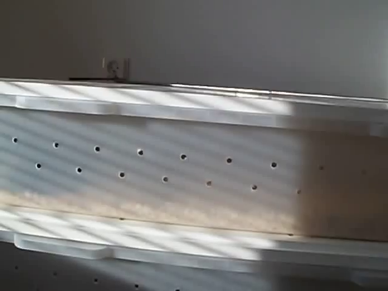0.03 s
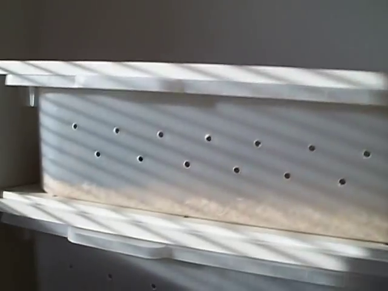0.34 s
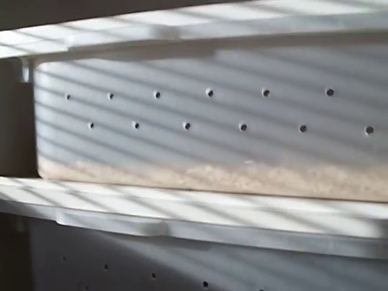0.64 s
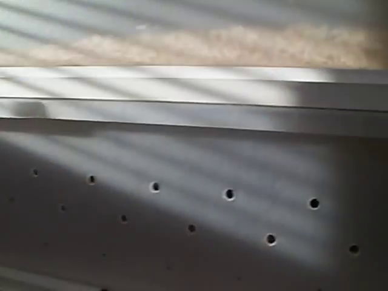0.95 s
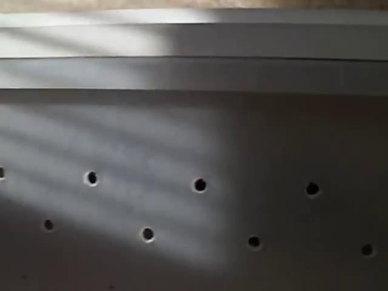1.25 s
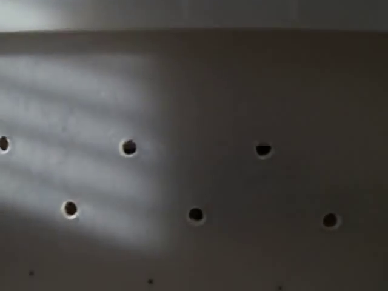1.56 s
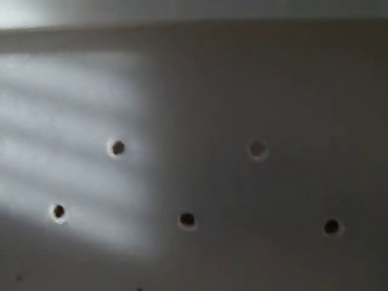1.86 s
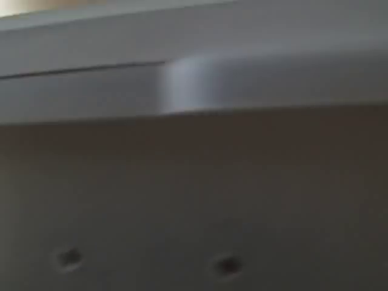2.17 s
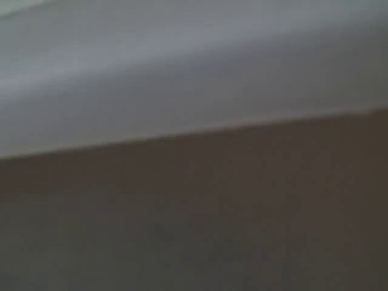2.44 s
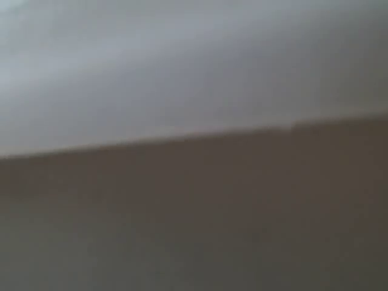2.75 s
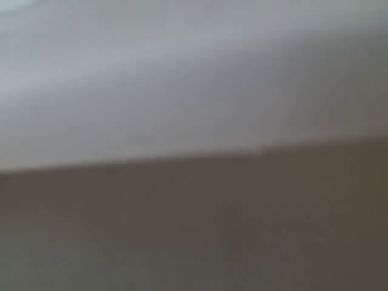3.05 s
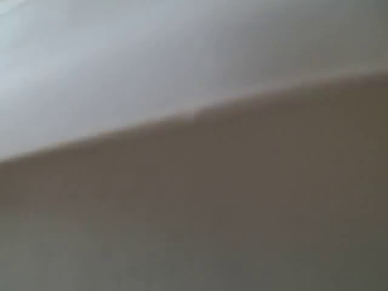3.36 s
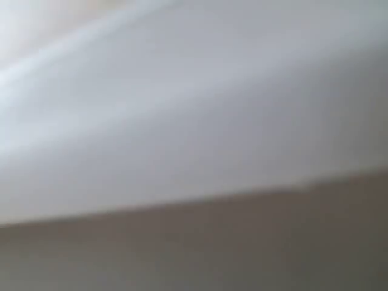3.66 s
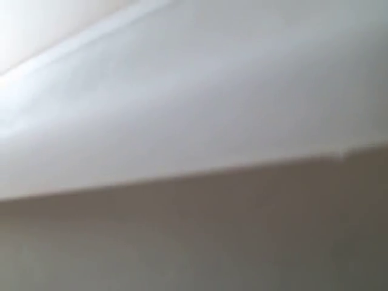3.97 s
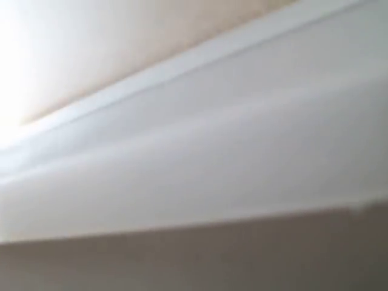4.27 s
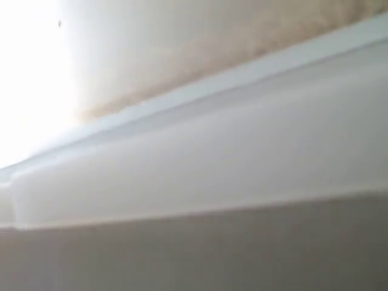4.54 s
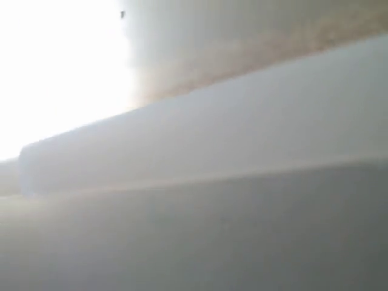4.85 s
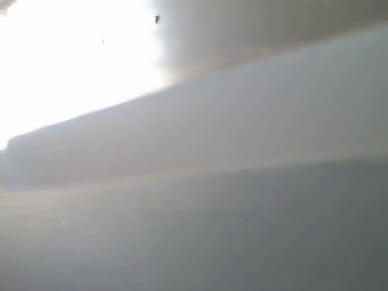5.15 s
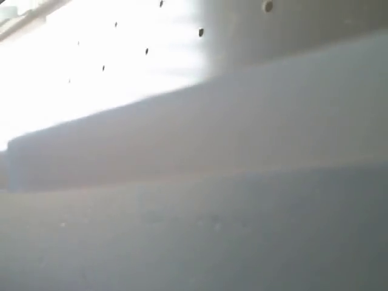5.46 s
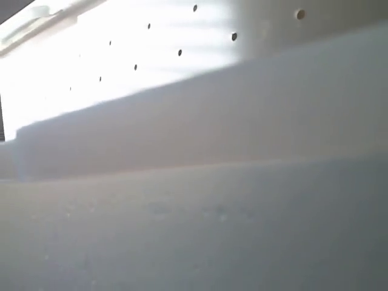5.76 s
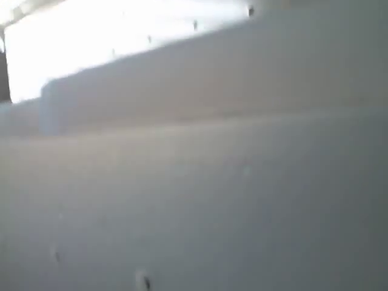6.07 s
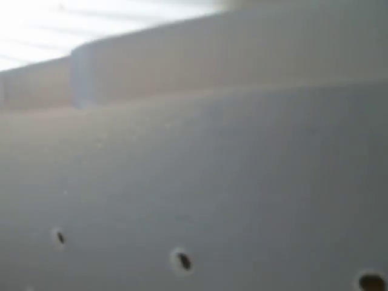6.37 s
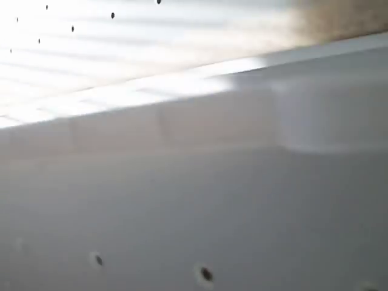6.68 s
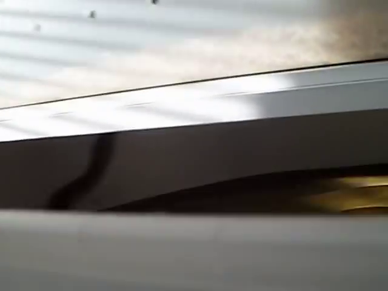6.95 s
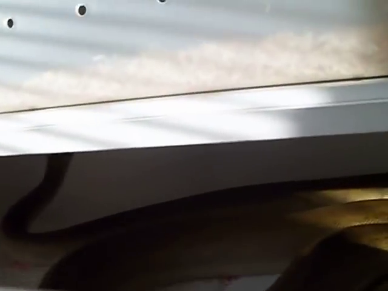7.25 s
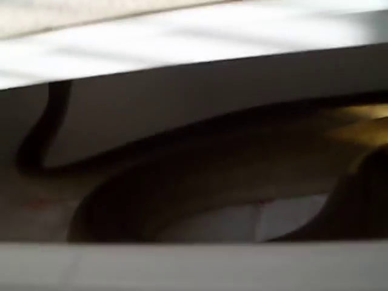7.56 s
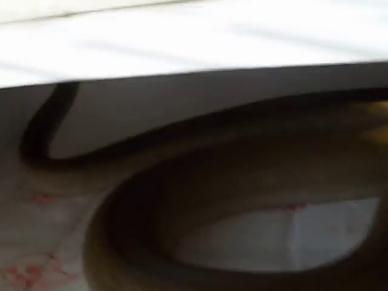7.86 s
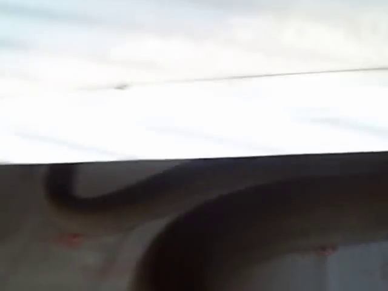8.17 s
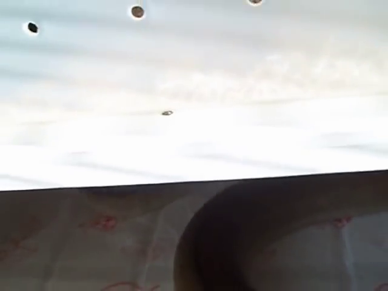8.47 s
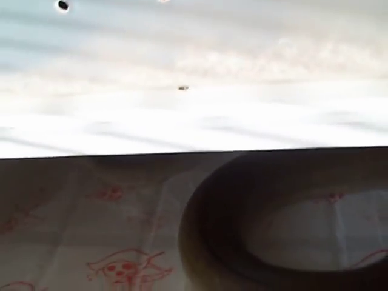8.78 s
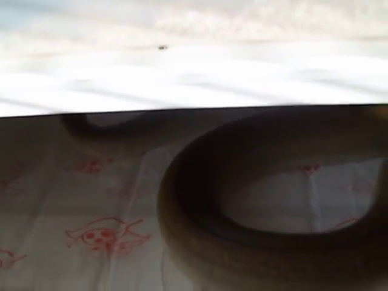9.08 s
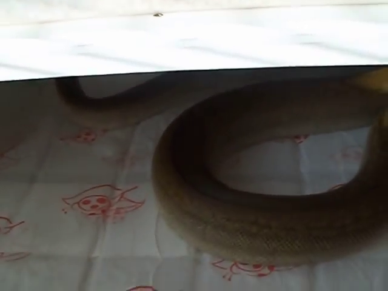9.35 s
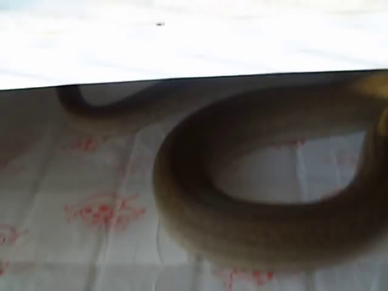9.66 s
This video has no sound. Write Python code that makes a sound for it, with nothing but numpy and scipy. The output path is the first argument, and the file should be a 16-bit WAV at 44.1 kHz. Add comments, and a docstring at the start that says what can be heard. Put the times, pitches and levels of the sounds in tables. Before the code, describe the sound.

In a quiet room, fingers rub a small hand-held camera in short strokes, its plastic case ticking, creaking and snapping sharply, with soft bumps against plastic tubs. About four seconds in, a large snake close by lets out one long hiss that puffs at the microphone. The rubbing, clicks and bumps return, and a second hiss starts at the very end. The microphone sounds dull.

```python
"""Faint room noise comes up as fingers rub a small hand-held camera in short strokes. Its plastic case
ticks, creaks and snaps, at times hard enough to overload it, and plastic tubs are bumped.
After about four seconds a large snake in a tub close by forces air through its throat: one long hiss
that puffs at the microphone. The handling goes on, and a second hiss begins at the end.
The single microphone passes little above 5 kHz and feeds both channels, the left slightly late."""
import sys
import numpy as np
from scipy import signal
from scipy.fft import rfft, irfft, next_fast_len
from scipy.io import wavfile
from scipy.ndimage import map_coordinates

SR = 44100
rng = np.random.default_rng(int(sys.argv[2]) if len(sys.argv) > 2 else 0)


def persist_wave(psi):
    """Save psi, clipped to +-1, as 16-bit WAV."""
    counts = np.round(np.clip(psi, -1, 1) * 32767).astype(np.int16)
    wavfile.write(sys.argv[1], SR, np.atleast_2d(counts).T)


N = 428652
TIME = np.arange(N) / SR


def from_db(db):
    """Turn decibels into a factor to multiply by."""
    return 10 ** (np.asarray(db) / 20)


def unit_level(x):
    """Scale a sound to an average (rms) level of 1."""
    return x / np.sqrt(np.mean(x ** 2) + 1e-20)


def add(track, start_s, sound):
    """Mix a short sound into the track."""
    at = max(round(start_s * SR), 0)
    track[at:at + len(sound)] += sound[:N - at]


def drift(rate_hz):
    """A smooth random wobble of size 1; a higher rate wobbles faster."""
    step, warm_up = 40, 2000
    r = np.exp(-2 * np.pi * step * rate_hz / SR)
    slow = signal.lfilter([1], [1, -2 * r, r * r], rng.standard_normal(N // step + warm_up + 2))[warm_up:]
    return np.interp(np.arange(N) / step, np.arange(len(slow)), unit_level(slow))


def coloured(x, tone):
    """Shape the lows and highs of x by a tone table, falling away past its ends; level 1."""
    hz, db = np.transpose(tone)
    size = next_fast_len(N)
    f = np.maximum(np.fft.rfftfreq(size, 1 / SR), 1)
    gain = from_db(np.interp(np.log(f), np.log(hz), db))
    gain *= np.minimum(f / hz[0], 1) ** 2 * np.minimum(hz[-1] / f, 1) ** 2
    return unit_level(irfft(rfft(x, size) * gain, size)[:N])


def fluttering_noise(tone, flutter_db, rate_hz):
    """Shaped noise whose level wavers."""
    return coloured(rng.standard_normal(N), tone) * from_db(flutter_db * drift(rate_hz))


def resonate(x, hz, width_hz):
    """Make x ring at one pitch; a narrower width rings longer."""
    r = np.exp(-np.pi * width_hz / SR)
    feedback = [1, -2 * r * np.cos(2 * np.pi * hz / SR), r * r]
    return signal.lfilter(np.array([1, 0, -1]) * (1 - r * r) / 2, feedback, x)


def fade_in(start_db=-18.5, length_s=0.53):
    """Bring a quiet sound up gradually at the start."""
    return from_db(start_db * np.maximum(1 - TIME / length_s, 0))


# Tone of the room and microphone noise: (frequency [Hz], level [dB])
ROOM_TONE = [(30, -3), (65, -9), (110, -3), (170, -8.5), (350, -7.5), (600, -14), (1000, -15),
             (1800, -17.5), (2500, -18.5), (3300, -18.5), (4300, -14), (5100, -21), (6500, -29.5)]
# Tone of the swaying grip: (frequency [Hz], level [dB])
GRIP_TONE = [(8, -2.5), (18, 1.5), (35, -8.5), (55, -14), (90, -25), (200, -33.5)]

def background(friction):
    """Room and microphone noise, plus a rumble from the grip that grows when the fingers move."""
    room = from_db(-53.5) * fade_in() * fluttering_noise(ROOM_TONE, flutter_db=1.5, rate_hz=6.4)
    sway = from_db(-46.5) * (friction / from_db(-42)) ** 0.15
    return room + sway * fluttering_noise(GRIP_TONE, flutter_db=3.5, rate_hz=6.2)


# Finger strokes: (fastest moment [s], friction [dB], swell [s], fade [s], scrape against friction [dB])
STROKES = [(.2, -56, 0.067, .04, -28), (.244, -37.5, 0.023, 0.0088, -26), (.366, -48, 0.011, 0.025, -28),
           (.435, -40.5, .005, 0.049, -25), (.49, -36, 0.049, 0.16, -23), (.645, -31.5, 0.036, 0.13, -27),
           (0.851, -44, .08, .08, -19), (.968, -21, 0.07, 0.051, -17), (1.11, -35.5, 0.067, 0.21, -14),
           (1.34, -44, 0.032, 0.59, -15), (1.49, -34.5, 0.026, 0.082, -28), (1.67, -27.5, 0.014, 0.05, -24),
           (1.941, -21.5, 0.046, 0.018, -21), (2.0, -34, 0.04, 0.024, -19), (2.19, -38.5, 0.099, 0.25, -17),
           (2.314, -34, 0.012, 0.065, -13), (2.545, -42.5, 0.042, 0.046, -26),
           (2.8, -45, 0.088, 0.14, -2.5), (3.15, -37.5, 0.012, 0.056, -15), (3.23, -36.5, .015, 0.024, -25),
           (3.3, -39, 0.012, 0.075, -6), (3.459, -34.5, 0.027, 0.016, -5), (3.585, -38, 0.071, 0.055, -16),
           (3.67, -42, .04, 0.056, -11), (3.9, -32, 0.065, 0.049, -14), (4.08, -46.5, 0.031, 0.046, -2),
           (6.21, -47, 0.081, 0.21, -6), (6.36, -38, 0.22, 0.18, -4.5), (6.596, -37, 0.014, 0.024, -2.5),
           (6.72, -48.5, .08, .1, -9), (6.83, -34.5, 0.059, 0.13, -18.5), (7.04, -42, 0.11, 0.14, -20),
           (7.305, -34, 0.0095, 0.05, -26), (7.57, -29.5, 0.14, 0.053, -23),
           (7.655, -30, 0.042, 0.053, -17), (7.86, -41, 0.15, 0.2, -6), (7.975, -44.5, .015, 0.26, 2),
           (8.16, -34, 0.044, 0.1, -11), (8.236, -25, 0.005, 0.022, -13.5), (8.731, -33, 0.11, 0.14, -10),
           (8.88, -46.5, .06, 0.29, -6), (9.15, -55, 0.17, 0.18, 0), (9.3, -49, 0.015, 0.013, -1)]

def finger_strokes(rest_friction_db=-52, rest_scrape_db=-60, drop_db=11):
    """How strong fine friction and coarse scraping are: each stroke rises above the resting grip."""
    fine_power = (from_db(rest_friction_db) * fade_in()) ** 2
    coarse_power = (from_db(rest_scrape_db) * fade_in()) ** 2
    for peak_s, db, swell_s, fade_s, scrape_db in STROKES:
        t = np.arange(-3 * swell_s, 3 * fade_s, 1 / SR)
        from_peak = np.maximum(-t / swell_s, t / fade_s)
        strength = from_db(db - drop_db * from_peak ** 1.27)
        add(fine_power, peak_s + t[0], strength ** 2)
        add(coarse_power, peak_s + t[0], (strength * from_db(scrape_db)) ** 2)
    return np.sqrt(fine_power), np.sqrt(coarse_power)


def slips(per_s, spread_db, smooth):
    """A surface sticks and lets go in tiny uneven jerks, over a share of smooth sliding noise."""
    sizes = from_db(spread_db * np.minimum(rng.exponential(1, N), 4)) * rng.choice([-1, 1], N)
    jerks = unit_level(sizes * (rng.random(N) < per_s / SR))
    return jerks + smooth * rng.standard_normal(N)


def cut_lows(x, hz):
    """Stiff plastic gives off little sound below hz."""
    return signal.sosfilt(signal.butter(2, hz, "high", fs=SR, output="sos"), x)


# Pitches at which the camera's case rings: (pitch [Hz], width [Hz], level [dB])
CASE_RINGS = [(1395, 450, -20), (2400, 220, -4.5), (2650, 310, -10.5), (3217, 270, -6.5), (3673, 200, -2),
              (3985, 225, -1), (4260, 502, -4.5), (4780, 300, -3), (5414, 500, -13.5)]

def ring_case(force):
    """Each small push sets the plastic case ringing."""
    ring = sum(from_db(db) * resonate(force + 1e-18, hz, width) for hz, width, db in CASE_RINGS)
    return cut_lows(ring, 2200)


# Tones of the fingers' fine friction and coarse scraping: (frequency [Hz], level [dB])
FRICTION_TONE = [(1000, -34), (1900, -25), (2200, -18.5), (2430, -9.5), (2850, -14.5), (3300, -4),
                 (3850, -1), (4300, -0.5), (4700, -1.5), (5100, -6.5), (5600, -10), (6500, -13.5)]
SCRAPE_TONE = [(50, 7), (120, 2.5), (350, -1), (600, -0.5), (950, 0), (1400, -4), (1900, -2), (2600, 1),
               (4000, -10)]

def rubbing(friction, scrape):
    """Sliding fingers make a stream of small slips; coarser grit rings the case, and the grip wavers."""
    pressure_db = 1.74 * drift(45)
    grit = from_db(-7) * unit_level(ring_case(slips(per_s=150, spread_db=1.5, smooth=0)))
    swish = 1.006 * coloured(slips(per_s=620, spread_db=2, smooth=1), FRICTION_TONE)
    rasp = coloured(slips(per_s=1200, spread_db=1, smooth=1.2), SCRAPE_TONE)
    fine = friction * from_db(pressure_db - 1.6) * (grit + swish)
    coarse = scrape * from_db(pressure_db / 2 - 1) * rasp
    return fine + coarse


def seam_ticks(friction, per_s=16, moving_db=-43):
    """The seams of the case tick at random, only while the fingers move."""
    clicks = (rng.random(N) < per_s / SR) * (friction > from_db(moving_db))
    return ring_case(clicks * from_db(-9 + 2 * rng.standard_normal(N)))


# Creaks and squeaks: (time [s], length [s], starting level [dB], pitch [Hz], width [Hz], change [dB])
CREAKS = [(0.235, 0.014, -51, 1730, 250, 3), (0.704, 0.033, -41, 2520, 220, -4),
          (1.061, .003, -16, 2400, 160, -9), (1.07, 0.19, -46, 2380, 450, -3),
          (1.473, 0.078, -33, 4020, 900, 4.5), (1.661, 0.085, -27, 4020, 600, -7),
          (2.254, 0.0048, -25, 1670, 700, -6.5), (2.312, 0.01, -23.5, 4620, 500, -2.5),
          (2.504, 0.072, -48, 544, 50, -14), (2.786, 0.11, -43.5, 4320, 450, -1),
          (2.772, 0.11, -49.5, 1930, 500, -6.5), (3.285, 0.028, -29.5, 4340, 400, -3.5),
          (3.287, 0.037, -34.5, 1810, 600, -5), (3.288, 0.043, -39, 760, 300, -5),
          (3.444, 0.025, -28.5, 4570, 400, -9), (3.457, .37, -51.5, 315, 59.4, -1.5),
          (3.57, 0.024, -29.5, 4650, 350, -0.5), (4.128, .002, -31, 3770, 160, -8),
          (6.2, .4, -56, 470, 70, -3), (6.807, 0.11, -32.5, 3400, 900, -7.5),
          (7.297, 0.046, -43, 2300, 320, 2), (7.486, 0.11, -34.5, 2170, 70, -14),
          (7.565, .025, -45, 950, 300, -3), (7.8, 0.64, -56.5, 362, 90, -1.5),
          (7.97, .2, -47, 950, 600, -8), (8.192, 0.0022, -14, 2450, 400, -8),
          (8.698, 0.064, -38, 3440, 900, 2)]

def creaks(gain_db=-1, grab_s=0.0011, release_s=0.0073):
    """A contact grabs, and its slips keep one part of the plastic singing until it lets go."""
    out = np.zeros(N)
    force = slips(per_s=1100, spread_db=3.5, smooth=0.93)
    for start_s, length_s, db, hz, width, change_db in CREAKS:
        t = TIME[:int((length_s + release_s) * SR)]
        push = force[int(start_s * SR):][:len(t)]
        squeak = unit_level(resonate(resonate(push, hz, width), hz, 3 * width))
        contact = np.minimum(t / grab_s, 1) * np.clip((length_s + release_s - t) / release_s, 0, 1)
        add(out, start_s, from_db(db + gain_db + change_db * t / length_s) * contact * squeak)
    return out


# Snaps of the case: (time [s], ring level [dB], centre pitch [Hz], slip length [s],
# level of the jolt's thump at the microphone [dB])
SNAPS = [(0.2388, -28.5, 3660, 0.0015, -47), (0.249, -30, 3600, 0.00063, -41),
         (.367, -45, 4000, .0008, -58), (.431, -44, 3900, .0006, -62), (0.54, -38, 4000, .001, -55),
         (0.5671, -1.5, 3920, 0.0035, -5), (0.618, -30.5, 3620, 0.0037, -51),
         (0.7016, -27.5, 3660, 0.0011, -25), (.7151, -28, 3600, 0.00076, -46),
         (0.726, -30.5, 3300, .0004, -50), (0.7345, -30.5, 3000, .0008, -40), (1.04, -33, 4230, .0005, -53),
         (1.0608, -17, 2980, 0.001, -42), (1.089, -32, 4130, .004, -50), (1.171, -31, 3700, .0008, -50),
         (1.4767, -27, 4530, 0.0038, -51), (1.483, -22, 4600, 0.0059, -51),
         (1.657, -24.5, 4070, 0.0034, -44), (1.9207, -11.5, 4180, 0.0027, -37),
         (1.9457, -8.5, 4530, 0.00066, -32), (1.9578, -21.5, 3800, .0005, -29),
         (2.2534, -23, 2980, 0.0012, -19.5), (2.3066, -22.5, 3450, 0.0035, -14),
         (2.627, -41.5, 3800, .0004, -52), (2.713, -35, 3940, 0.00059, -24.5),
         (2.772, -33, 3680, 0.00073, -29), (3.167, -32.5, 3930, 0.0002, -42),
         (3.288, -29.5, 4100, 0.001, -25.5), (3.307, -32, 4600, .001, -45), (3.446, -31, 4700, .001, -48),
         (3.585, -30, 4700, .001, -48), (3.607, -37, 4160, 0.00205, -31.5), (3.848, -24, 3670, 0.0013, -32),
         (4.014, -40.5, 4100, .0005, -55), (4.129, -29, 3700, 0.0007, -39),
         (6.3492, -23.5, 4100, 0.0013, -20.5), (6.3614, -29, 4350, 0.00074, -20),
         (6.8089, -27.5, 3520, 0.00081, -53), (6.826, -29, 4400, .001, -52),
         (7.298, -26, 3900, 0.00084, -29), (7.3407, -29, 3960, 0.0023, -31),
         (7.413, -42, 2000, 0.00086, -50), (7.4643, -36, 4460, .0006, -46),
         (7.4838, -3.5, 3180, 0.0033, -33), (7.564, -26.5, 3920, 0.0026, -44),
         (7.653, -15, 2970, 0.00022, -15.5), (7.6834, -13, 3930, 0.0011, -44),
         (7.696, -14, 4430, 0.00054, -18), (7.718, -36, 3730, .0008, -48), (7.769, -40, 3800, .0006, -50),
         (7.8724, -34, 4270, 0.00045, -50), (8.0695, -29.5, 3200, 0.0015, -34),
         (8.1944, -2.5, 3860, 0.0021, -10.5), (8.2313, -19, 3300, 0.0011, -16),
         (8.258, -23, 4040, 0.0047, -43), (8.264, -10, 3820, 0.00055, -23),
         (8.4141, -21, 4060, 0.00094, -44)]

def snaps(jolt_s=0.00023, settle_s=0.0014, chatter=0.23, focus_hz=900, uneven_db=1.65):
    """A seam lets go with a short chatter that rings the case; the jolt hits the microphone as a pulse."""
    out, t = np.zeros(N), TIME[:SR // 25]
    ring_hz, width_hz, ring_db = np.transpose(CASE_RINGS)
    pulse = np.exp(-t / jolt_s) - jolt_s / settle_s * np.exp(-t / settle_s)
    for start_s, db, centre_hz, slip_s, jolt_db in SNAPS:
        forces = chatter * rng.standard_normal((len(CASE_RINGS), len(t))) * np.exp(-(t / slip_s) ** 4)
        forces[:, 0] = 1  # the first sharp kick
        gains = from_db(ring_db + uneven_db * rng.standard_normal(len(CASE_RINGS)))
        gains /= 1 + ((ring_hz - centre_hz) / focus_hz) ** 2  # where it slips favours some pitches
        ring = sum(gain * unit_level(resonate(force, hz, width))
                   for gain, force, hz, width in zip(gains, forces, ring_hz, width_hz))
        ring = cut_lows(ring, centre_hz / 2)
        opening_level = np.sqrt(np.mean(ring[:SR // 200] ** 2))  # over the first 5 ms
        add(out, start_s, from_db(db) * ring / opening_level + 2 * from_db(jolt_db - 2) * pulse)
    return out


# Bumps of hand and tub: (time [s], peak [dB], pitch [Hz], time to fade 60 dB [s], rubbing share [0-1])
BUMPS = [(0.9644, -22.5, 335, 0.0064, 0.57), (1.1244, -16.5, 368, 0.0079, .034),
         (1.475, -25.5, 218, 0.011, .2), (1.658, -27.5, 73.6, 0.066, .1), (2.309, -28, 44.3, 0.066, .1),
         (2.716, -28.5, 260.8, 0.25, 0.57), (2.719, -31.5, 144, 0.19, 0.49),
         (4.089, -30.5, 98.5, 0.22, 0.31), (6.348, -35, 128, 0.37, .67), (6.864, -39, 129, 0.11, .5),
         (7.3, -28, 55, 0.035, .1), (7.652, -22.5, 173, 0.012, 0.52), (7.695, -28.5, 170, .02, 0.58),
         (7.971, -29, 730, 0.11, 0.77), (8.619, -33.5, 95, 0.14, 0.41), (8.678, -29, 100, 0.16, 0.33),
         (8.736, -31.5, 86.4, 0.28, .6), (8.885, -32, 100, 0.14, 0.54), (8.88, -35, 199, .15, 0.34)]

def bumps(damping=0.66):
    """A soft blow makes a low note that dies fast, blurred by the rubbing of the contact."""
    out, t = np.zeros(N), TIME[:SR // 3]
    for start_s, db, hz, fade_s, share in BUMPS:
        noise = rng.standard_normal(len(t))
        blur = unit_level(resonate(resonate(noise, hz, damping * hz), hz, 2 * hz)) * np.minimum(t * hz, 1)
        note = np.sin(2 * np.pi * hz * t)
        thud = ((1 - share) * note + share * blur) * from_db(-60 * t / fade_s)
        add(out, start_s, from_db(db) * thud / np.abs(thud).max())
    return out


def singing_air(hz, width_hz):
    """Swirling air: a band of noise whose centre follows the pitch curve hz; level 1."""
    r, warm_up = np.exp(-np.pi * width_hz / SR), SR // 10
    noise = rng.standard_normal((2, len(hz) + warm_up))
    real, imag = signal.lfilter([1], [1, -2 * r, r * r], noise)[:, warm_up:]
    phase = 2 * np.pi * np.cumsum(hz) / SR
    return unit_level(real * np.cos(phase) - imag * np.sin(phase))


# Tones of the hiss's broad breath, sharp edge and low rush: (frequency [Hz], level [dB])
BREATH_TONE = [(250, -12.5), (450, 1), (650, -0.5), (1000, -0.5), (1800, -2), (2400, -.5), (2850, -2.5),
               (3200, -2.5), (3800, -17.5), (5000, -30)]
EDGE_TONE = [(2500, -33.5), (3200, -6.5), (3700, -1.5), (4200, -3), (4700, 0.5), (5100, -5), (5600, -11.5),
             (6500, -17.5)]
RUSH_TONE = [(40, -17), (75, -2.5), (110, -2.5), (170, -2.5), (260, -1.5), (330, -6), (450, -11),
             (700, -23), (1500, -35)]
# Pitches at which the air in the tub and its shelf rings: (pitch [Hz], width [Hz], level [dB])
TUB_RINGS = [(101, 40, -4), (162.8, 9, -0.5), (180.3, 9.2, -2), (261.8, 6, 0.5), (437.6, 16, -1),
             (475, 30, -5), (740, 18, -6.5), (880, 28, -11), (1240, 21, -11.5), (1710, 40, -10.5),
             (2160, 30, -11), (2870, 24, -7.5), (4200, 100, -12.5)]
# How each hiss unfolds:
# (time [s], breath [dB], edge [dB], rush [dB], lower throat pitch [Hz], upper throat pitch [Hz])
LONG_HISS = [(4.16, -46.5, -50, -46, 2706, 4160), (4.28, -37, -37, -35, 2870, 4100),
             (4.32, -31.5, -29, -26, 2880, 4110), (4.37, -33, -31, -33, 2840, 4060),
             (4.44, -30, -33.5, -32, 2890, 4160), (4.48, -34, -33.5, -42, 2820, 4180),
             (4.52, -32, -30.5, -40, 2850, 4110), (4.56, -34, -34, -33, 2830, 4100),
             (4.83, -29, -28, -31, 2820, 4160), (4.98, -33, -34, -33, 2880, 4200),
             (5.04, -34, -37, -37.5, 2830, 4030), (5.14, -32.5, -32, -27.5, 2780, 4120),
             (5.17, -30.5, -30.5, -34, 2750, 4150), (5.39, -34, -34, -33, 2920, 4130),
             (5.43, -36, -36, -29, 2810, 4130), (5.46, -33.5, -34, -33, 2775, 4220),
             (5.5, -33.5, -34, -25, 2870, 4150), (5.56, -34.5, -36, -36, 2830, 4080),
             (5.95, -38, -41, -44, 2850, 4170), (6.0, -39, -44, -42, 2860, 4130),
             (6.14, -47, -52, -55, 2770, 4180), (6.17, -50, -53, -55, 2770, 4020)]
SECOND_HISS = [(9.4, -57.5, -72, -64, 3260, 4180), (9.416, -59, -59, -64, 3200, 4190),
               (9.53, -45, -45, -47.5, 3180, 4120), (9.634, -46, -44.5, -48, 3140, 4150),
               (9.71, -38, -40.5, -46, 3210, 4250)]

def snake_hiss(fade_db_per_s=170, throat_width_hz=430):
    """Air forced through the windpipe's opening hisses, rings at two throat pitches and fills the tub."""
    levels = np.zeros((3, N))
    for hiss in (LONG_HISS, SECOND_HISS):
        times, *columns = np.transpose(hiss)
        levels_db = np.array([np.interp(TIME, times, db) for db in columns[:3]])
        outside_s = np.abs(TIME - np.clip(TIME, times[0], times[-1]))  # time before or after this hiss
        levels += from_db(levels_db - fade_db_per_s * np.minimum(outside_s, 1))
    breath, edge, rush = levels
    times, *_, lower_hz, upper_hz = np.vstack([LONG_HISS, SECOND_HISS]).T
    throat = from_db(-5) * singing_air(np.interp(TIME, times, lower_hz), throat_width_hz)
    throat += from_db(-3) * singing_air(np.interp(TIME, times, upper_hz), throat_width_hz)
    air = breath * from_db(2.05) * fluttering_noise(BREATH_TONE, flutter_db=0.5, rate_hz=25)
    air += edge * (throat + from_db(3.5) * fluttering_noise(EDGE_TONE, flutter_db=0.7, rate_hz=25))
    air += rush * from_db(-1) * coloured(rng.standard_normal(N), RUSH_TONE)
    return air + sum(from_db(db) * resonate(air, hz, width) for hz, width, db in TUB_RINGS)


# Puffs of the snake's breath: (time [s], hold [s], level [dB], pitch [Hz], width [Hz])
PUFFS = [(4.298, 0.044, -23.5, 80.2, 45), (4.305, 0.041, -29.5, 371, 350), (4.315, 0.094, -25.5, 60, 12),
         (5.115, 0.028, -29, 106, 60), (5.478, .04, -25.5, 162, 23), (5.485, .03, -32.5, 463.7, 160)]

def puffs(rise_s=0.01, release_s=0.045):
    """A gust hits the microphone with a low flutter, then dies away."""
    out = np.zeros(N)
    for start_s, hold_s, db, hz, width in PUFFS:
        t = TIME[:int((hold_s + release_s) * SR)]
        gust = np.minimum(t / rise_s, 1) * np.clip((hold_s + release_s - t) / release_s, 0, 1)
        add(out, start_s, from_db(db) * gust * singing_air(np.full(len(t), hz), width))
    return out


def scene():
    """All the sounds meet at one microphone, which feeds both channels."""
    friction, scrape = finger_strokes()
    sound = snake_hiss() + puffs()
    sound += rubbing(friction, scrape) + seam_ticks(friction) + creaks() + snaps() + bumps()
    sound += background(friction)
    return np.array([sound, sound])


def record(dry, mic_top_hz=5606, soften_hz=10000, cutoff_hz=15700, left_lag_s=8.3e-5):
    """The microphone loses the highs and overloads on the hardest snaps; the left channel comes late."""
    dull = signal.sosfilt(signal.ellip(8, 0.3, 75, mic_top_hz, fs=SR, output="sos"), dry)
    overloaded = np.clip(dull, -1, 1)
    left, right = signal.sosfilt(signal.butter(2, soften_hz, fs=SR, output="sos"), overloaded)
    left = map_coordinates(left, [np.arange(N) - left_lag_s * SR], order=3)
    return signal.sosfilt(signal.cheby2(12, 60, cutoff_hz, fs=SR, output="sos"), [left, right])


dry = scene()
out = record(dry)
persist_wave(out)
```